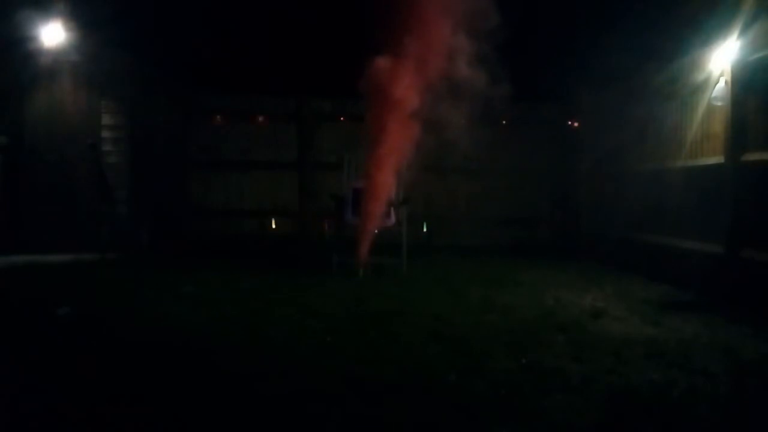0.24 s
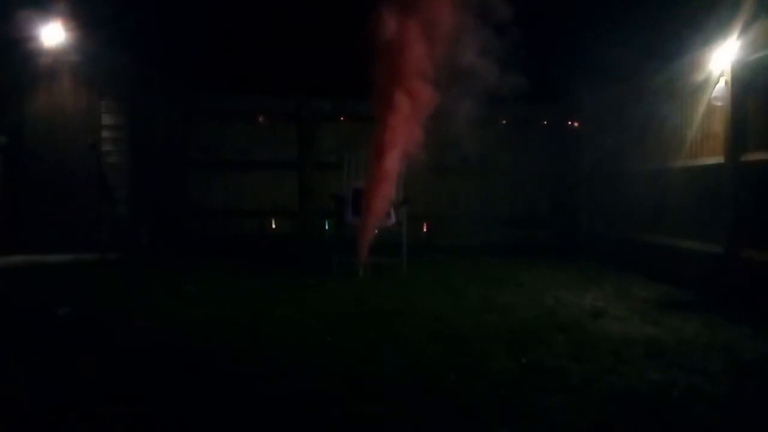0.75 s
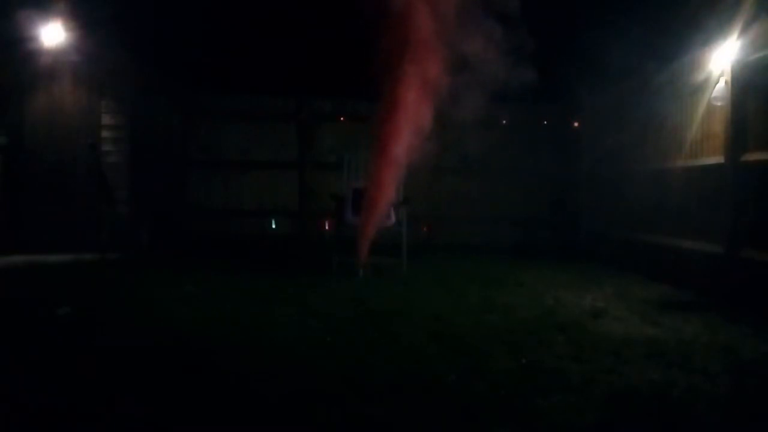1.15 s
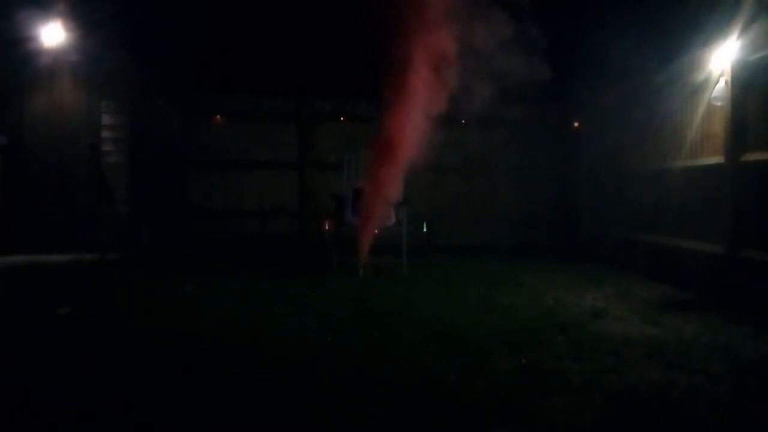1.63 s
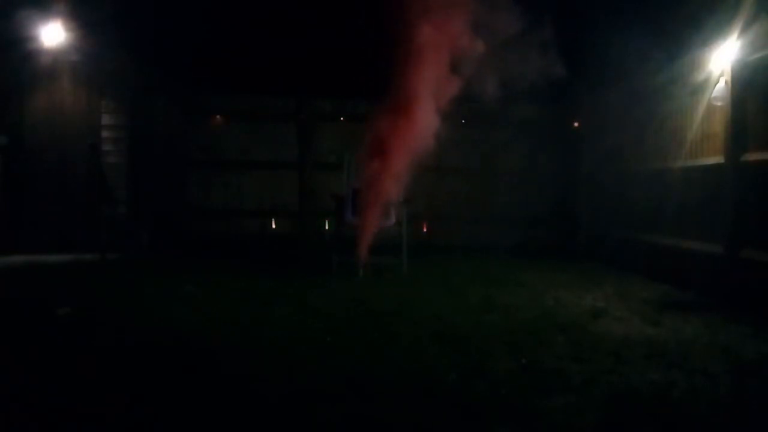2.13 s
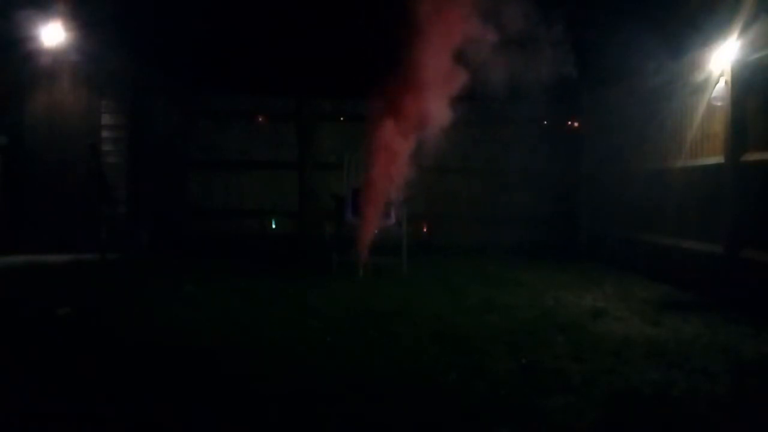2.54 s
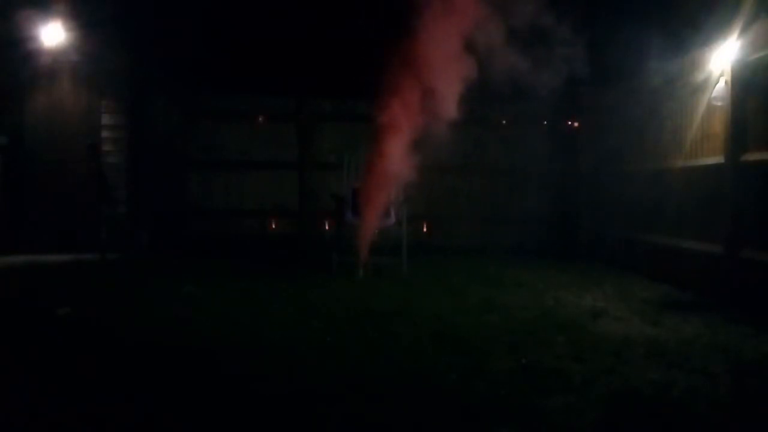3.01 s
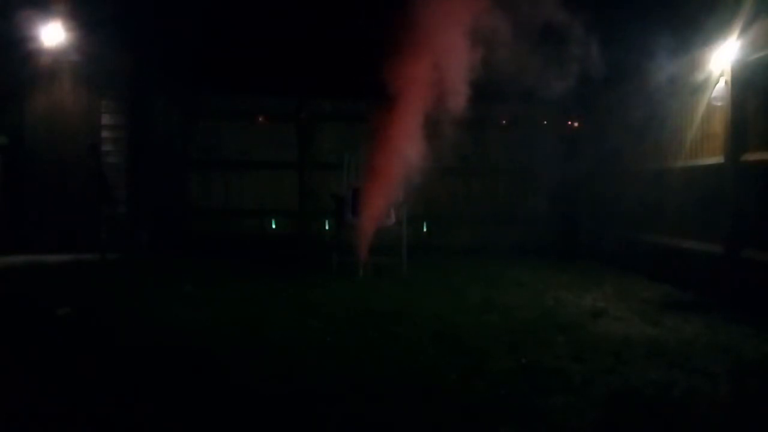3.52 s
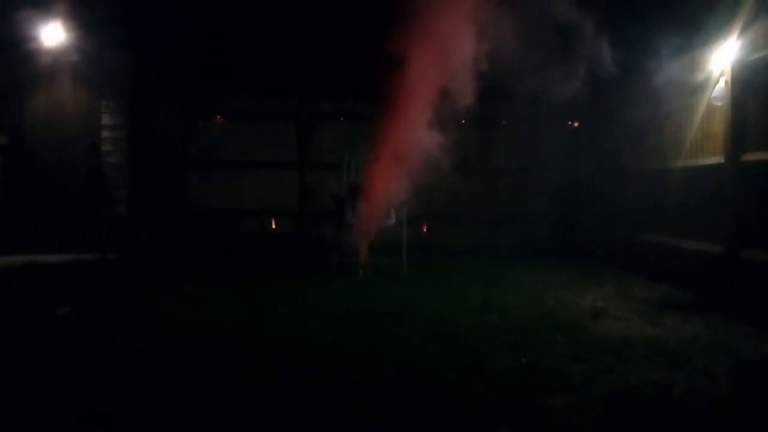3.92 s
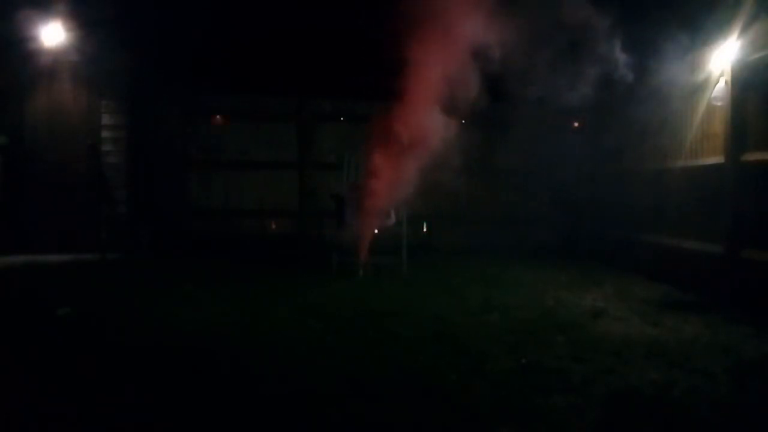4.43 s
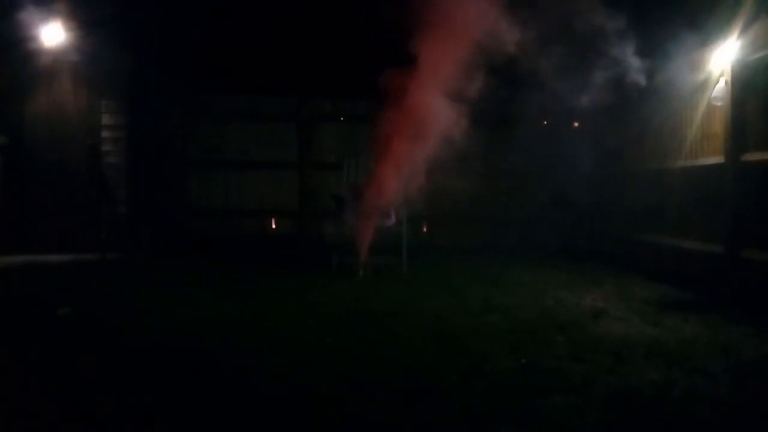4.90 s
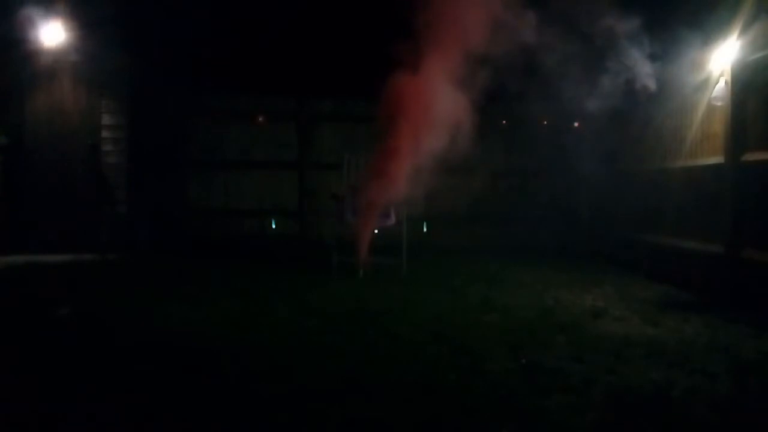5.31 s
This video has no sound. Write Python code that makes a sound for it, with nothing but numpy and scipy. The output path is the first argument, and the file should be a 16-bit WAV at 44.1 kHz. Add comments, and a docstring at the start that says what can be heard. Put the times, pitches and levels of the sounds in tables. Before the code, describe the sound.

Night yard, one small mono microphone. Pressurised smoke hisses continuously, strongest in the high mids, with thin metallic resonances and grainy sputter. A soft far thud opens it. Around the middle, over a dozen loud bangs crowd into a quarter second, ringing off nearby walls; a brief, broad swell of hiss follows. The hiss then continues, fading very slightly, with a faint distant pop near the end.

```python
"""A smoke grenade hisses on a lawn at night, heard by one small microphone.
Its jet is coloured noise with narrow canister resonances and random spits; once the hiss swells and broadens.
A volley of firework bangs, pulses with short rings, echoes between fences and houses; one faint bang follows.
A few dull thuds, low-passed noise bursts, come from far off; a low noise wash fills in the surroundings."""
import sys
import numpy as np
from scipy import signal
from scipy.fft import rfft, irfft
from scipy.io import wavfile
from scipy.ndimage import uniform_filter1d

SR = 44100
rng = np.random.default_rng(int(sys.argv[2]) if len(sys.argv) > 2 else 0)


def generate_wav(sig):
    """Save sig (samples, or channels by samples) to the path in sys.argv[1] as 16-bit PCM at SR."""
    pcm = np.round(np.clip(np.atleast_2d(sig).T, -1, 1) * 32767).astype(np.int16)
    wavfile.write(sys.argv[1], SR, pcm)


N = 245195
TIME, BINS = np.arange(N) / SR, np.fft.rfftfreq(N, 1 / SR)  # t/s and f/Hz of the whole scene


def gain_of(db):
    """Decibels to amplitude."""
    return 10 ** (np.asarray(db) / 20)


def evened(x):
    """Scales to rms 1."""
    return x / np.sqrt(np.mean(x ** 2) + 1e-20)


def smooth(x, size, axis=-1):
    """Running mean over size points."""
    return uniform_filter1d(x, size=size, axis=axis)


def read(points, hz):
    """Reads a table over frequency on a log-frequency axis."""
    f, value = np.transpose(points)
    return np.interp(np.log(hz + 1), np.log(f + 1), value)


def follow(rows, t):
    """Every column of a curve at the times t."""
    s, *columns = np.transpose(rows)
    return [np.interp(t, s, c) for c in columns]


def humps(modes, hz):
    """The lift (or dip) in dB of a set of resonances."""
    return sum(db / (1 + (2 * (hz - f) / width) ** 2) for f, width, db in modes)


def arch(s, half):
    """A smooth rise to 1 at s seconds and an equal fall."""
    return np.exp(-((TIME - s) / half) ** 2)


def add(mix, s, sound):
    """Lays a sound into the mix at s seconds."""
    part = mix[round(s * SR):][:len(sound)]
    part += sound[:len(part)]


def tinted(x, db):
    """Filters a full-length signal by a gain in dB at each bin."""
    return irfft(rfft(x) * gain_of(db), N)


def turbulence(colour_db, patchy_db, flicker_db, lift=None):
    """Coloured noise, rms 1, with drifting patches and a quick flicker shared by all bands."""
    noise = tinted(rng.standard_normal(N), colour_db)
    hz, t, z = signal.stft(noise, SR, nperseg=512, noverlap=384)
    patches = smooth(rng.standard_normal(z.shape), 9, axis=0)
    patches = evened(smooth(patches, 30, axis=1))
    flicker = evened(smooth(rng.standard_normal(len(t)), 12))
    field_db = patchy_db * patches + flicker_db * flicker
    if lift:
        field_db = field_db + lift(hz[:, None], t)
    return evened(signal.istft(z * gain_of(field_db), nperseg=512, noverlap=384)[1][:N])


# spectra of the jet's hiss and of its lower rush, relative: f/Hz, level/dB (per Hz)
HISS_COLOUR = [(900, -39), (1500, -23.5), (1750, -13), (2200, -12.5), (2700, -5), (3050, -10), (3500, -5.5),
               (4300, -3.5), (5100, -2), (6600, -.5), (7900, -14.5), (9600, -25), (11200, -31.5),
               (11800, -42.5), (13800, -46), (14600, -41), (15700, -35)]
RUSH_COLOUR = [(250, -36), (400, -16), (750, -8.5), (1100, -5.5), (1470, -7), (2200, -1.5), (2700, -1.5),
               (4000, -18.5), (8000, -43)]
# narrow resonances of the canister, one of them a dip: f/Hz, width/Hz, level/dB against the smooth spectrum
CANISTER_MODES = [(740, 22, 6), (2383, 12.6, 13), (2788, 89, 9), (2954, 28, 11.5), (3125, 34, 12.5),
                  (3348, 48, 9), (3560, 57, 8.5), (3680, 22, 11), (3910, 34, 8.5), (4086, 20, 9.5),
                  (4267, 26, 10.5), (4436, 104, 5), (4420, 44, 1.5), (4604, 32, 8), (4685, 19, 9.5),
                  (4970, 35, 3.5), (5105, 15, 8), (6000, 35, -23), (6300, 130, 2.5), (6800, 150, 0.5),
                  (10600, 87, 5), (11100, 120, 0.5)]
# surges of the burn: t/s, half length/s, lift/dB before the hiss and the rush each scale it
BURN_SURGES = [(0.11, 0.25, 2), (2.278, 0.28, 1.8), (4.42, 0.48, 1.2)]


def jet(spits_per_s=700, hiss_per_surge=0.83, rush_per_surge=3.6):
    """Gas rushes from the vent, coloured by the canister; burning grains spit in it."""
    surge_db = sum(db * arch(s, half) for s, half, db in BURN_SURGES)
    # the hiss weakens steadily as the charge burns down; the rush follows each surge more strongly
    hiss_db = -38 - 0.21 * TIME + hiss_per_surge * surge_db
    rush_db = -53 + rush_per_surge * surge_db
    crowd = evened(smooth(rng.standard_normal(len(BINS)), 330))  # many weak, close resonances
    crowd_db = read([(2000, 1), (2600, .4), (4500, .5), (6500, 1.2), (8000, 1.9)], BINS)  # f/Hz, depth/dB
    ring_db = humps(CANISTER_MODES, BINS) + crowd_db * crowd
    colour_db = read(HISS_COLOUR, BINS) + ring_db
    hiss = turbulence(colour_db, patchy_db=0.6, flicker_db=0.25, lift=ground_echo)
    grains = (rng.random(N) < spits_per_s / SR) * rng.standard_normal(N)
    spit = evened(tinted(grains, colour_db))
    rush = turbulence(read(RUSH_COLOUR, BINS) + ring_db, patchy_db=1.5, flicker_db=0.0)
    return gain_of(hiss_db) * (hiss + gain_of(-11.5) * spit) + gain_of(rush_db) * rush


# spectrum of the swelling hiss, relative: f/Hz, level/dB (per Hz)
SWELL_SPECTRUM = [(600, -32.5), (1080, 0.5), (1400, -12.5), (2000, -2), (2600, 3), (3200, -3), (4500, -3),
                  (6400, 1), (7800, -13), (9000, -16.5), (12000, -36), (14000, -42), (15500, -32)]


def swell(peak_s=3.69, peak_db=-32, rise_db_per_s=66, fall_db_per_s=78):
    """The one big flare: the hiss grows wider and louder, climbs to a point and falls back."""
    below_db = np.maximum(rise_db_per_s * (peak_s - TIME), fall_db_per_s * (TIME - peak_s))
    flare = turbulence(read(SWELL_SPECTRUM, BINS), patchy_db=0.5, flicker_db=0.6, lift=ground_echo)
    return gain_of(peak_db - below_db) * flare


# extra path of the echo off the ground as the jet leans: t/s, path/m
LEANING_PATH = [(0.5, 0.19), (2.2, 0.17), (3.2, 0.14), (3.9, 0.18)]


def ground_echo(hz, t, strength=0.12, sound_speed=343, drift_db=2.15):
    """One close echo combs the hiss; fainter ones leave fine stripes that drift slowly."""
    path, = follow(LEANING_PATH, t)
    comb = abs(1 + strength * np.exp(2j * np.pi * hz * path / sound_speed))
    stripes = smooth(rng.standard_normal(comb.shape), 2, axis=0)
    return 20 * np.log10(comb) + drift_db * evened(smooth(stripes, 350, axis=1))


# spectrum of a pulse, its boom and its sharp front, relative: f/Hz, level/dB (per Hz)
BOOM_COLOUR = [(25, -35.5), (60, -25), (100, -18), (165, -23.5), (215, -28), (290, -15.5), (380, -6),
               (520, -1.5), (800, 2), (1080, -0.5), (1500, -9), (2100, -8.5), (3500, -21.5), (8000, -61),
               (13000, -77)]
CRACK_COLOUR = [(300, -36.5), (1000, -3), (2200, 3.5), (3200, -0.5), (5000, -7.5), (6800, -10), (8000, -33),
                (14000, -63)]


def pulse(colour, size=4096):
    """The shortest causal pressure pulse with this spectrum (minimum phase), peak 1."""
    log_gain = np.log(gain_of(read(colour, abs(np.fft.fftfreq(size, 1 / SR)))))
    x = np.fft.ifft(np.exp(np.conj(signal.hilbert(log_gain)))).real[:size // 2]
    return x / abs(x).max()


# bangs: t/s, boom peak level/dB, crack level/dB and ring level/dB against the boom, ring f/Hz,
# echo level/dB against the bang, before the yard's overall trim
FIREWORKS = [(2.9044, -14.5, -3, -5.5, 563, 4), (2.9132, -22, -16, 4, 710, 10),
             (2.9363, -16, -1, 6.5, 770, 0.5), (2.9436, -11.5, -6, -5, 885, -9),
             (2.9504, -15.5, -9, 5, 680, 8), (2.976, -14.5, -4.5, -17, 985, 3),
             (2.986, -17, 2, -20, 1120, 1.5), (2.996, -16.5, -20, -2, 1020, -4),
             (3.002, -16, -15, -3, 1140, 2.5), (3.0227, -13, -1, -14, 900, -7),
             (3.059, -15, -9, -1.5, 970, 1.5), (3.0751, -14, -14, -7, 880, 0.5),
             (3.0846, -18, 1.5, 2, 790, 2.5), (3.105, -26, -8, 4, 950, -1), (3.15, -25.5, -20, 2, 900, -1),
             (4.869, -41.5, 11.5, -6, 1500, 2)]
# pitches the yard favours or dulls: f/Hz, width/Hz, level/dB (in the echoes; scaled for the night wash)
YARD_PITCHES = [(377, 27, 2.5), (534, 20, 3), (700, 35, -1), (718, 25, 4.5), (820, 28, -1), (995, 19, -4.5)]


def volley(ring_s=0.00062, low_cut_hz=330):
    """Each bang is a boom with a crack on its front, a few cycles of ring and its own path of echoes."""
    boom, crack = pulse(BOOM_COLOUR), pulse(CRACK_COLOUR)
    t = np.arange(len(boom)) / SR
    ring_shape = (t / (2 * ring_s)) ** 2 * np.exp(2 - t / ring_s)  # swells to 1, then dies
    no_bass = signal.butter(2, low_cut_hz, "highpass", fs=SR)
    direct, echoes = np.zeros(N), np.zeros(N)
    for s, db, crack_db, ring_db, ring_hz, echo_db in FIREWORKS:
        bang = gain_of(db) * (boom + gain_of(crack_db) * crack)
        ring = gain_of(db + ring_db) * ring_shape * np.cos(2 * np.pi * ring_hz * t)
        add(direct, s, -(bang + signal.lfilter(*no_bass, ring)))  # direct sound has its sign flipped
        add(echoes, s, gain_of(echo_db) * yard(bang))
    for hz, width, db in YARD_PITCHES:
        b, a = signal.iirpeak(hz, hz / width, SR)
        echoes = echoes + (gain_of(db) - 1) * signal.lfilter(b, a, echoes)
    return direct + gain_of(-0.86) * echoes


# how long the houses hold each band: f/Hz, time to fall 60 dB t60/s
HOUSE_DECAY = [(60, 1.5), (300, 1.3), (900, 1.47), (2000, 1.37), (6000, 0.74)]


def yard(x, near_db=2.0, near_t60=0.21, far_db=-4.5, gap=0.0026):
    """Dense early echoes off the fences and a long tail from the houses, fading in over gap seconds."""
    taps = rng.choice([-1., 1.], SR) * (rng.random(SR) < 3000 / SR)  # about 3000 reflections per second
    hz, t, z = signal.stft(taps, SR, nperseg=256)
    fading = z * gain_of(-60 * t / read(HOUSE_DECAY, hz)[:, None])
    far = signal.istft(fading, SR, nperseg=256)[1][:SR]
    t = np.arange(SR) / SR
    near = rng.permutation(taps) * gain_of(-60 * t / near_t60)
    echoes = gain_of(near_db) * evened(near) + gain_of(far_db) * evened(far)
    return signal.fftconvolve(x, echoes * np.minimum(t / gap, 1) / np.sqrt(SR))


# layers of far thuds (the last three rows make one thud): t/s, level/dB, half length/s, dull above f/Hz
THUD_LAYERS = [(0.029, -41, 0.013, 1200), (1.358, -51.5, 0.054, 1100), (1.662, -60, 0.017, 68),
               (1.832, -61, .02, 62), (4.887, -44.5, 0.011, 2500), (4.902, -43, 0.015, 750),
               (4.905, -64, 0.023, 110)]


def thuds():
    """Far bangs arrive smeared and without treble: noise in the boom's colour, low-passed."""
    out = np.zeros(N)
    for s, db, half, dull_hz in THUD_LAYERS:
        colour_db = read(BOOM_COLOUR, BINS) - 20 * np.log10(1 + (BINS / dull_hz) ** 3)
        roll = evened(tinted(rng.standard_normal(N), colour_db))
        out += gain_of(db) * roll / (1 + ((TIME - s) / half) ** 4)
    return out


# spectrum of the wash of the surroundings, relative: f/Hz, level/dB (per Hz)
NIGHT_SPECTRUM = [(20, -35), (60, -22.5), (100, -14.5), (150, -21.5), (215, -22.5), (290, -13), (370, -8.5),
                  (520, -1.5), (640, -1.5), (740, 1), (900, 2), (1150, -1), (1480, -10), (3000, -40)]
# its loudness through the scene: t/s, level/dB
NIGHT_LEVEL = [(0.1, -52), (0.8, -54), (2.0, -53), (2.8, -50.5), (4.8, -51), (5.3, -54)]


def night():
    """A low, uneven wash from the surroundings, coloured by the yard."""
    colour_db = read(NIGHT_SPECTRUM, BINS) + 1.37 * humps(YARD_PITCHES, BINS)
    wash = turbulence(colour_db, patchy_db=1.97, flicker_db=0.84)
    return gain_of(follow(NIGHT_LEVEL, TIME)[0]) * wash


def scene():
    """All sources, the same in both channels."""
    return np.tile(jet() + swell() + volley() + thuds() + night(), (2, 1))


def record(dry, edge_hz=15850):
    """The small microphone has a dip in the low range; then the recorder's band limit."""
    coloured = signal.lfilter(*signal.iirnotch(220, 5, SR), dry)
    band_limit = signal.firwin(511, edge_hz, window=("kaiser", 9), fs=SR)
    return signal.oaconvolve(coloured, band_limit[None], "same")


dry = scene()
out = record(dry)
generate_wav(out)
```